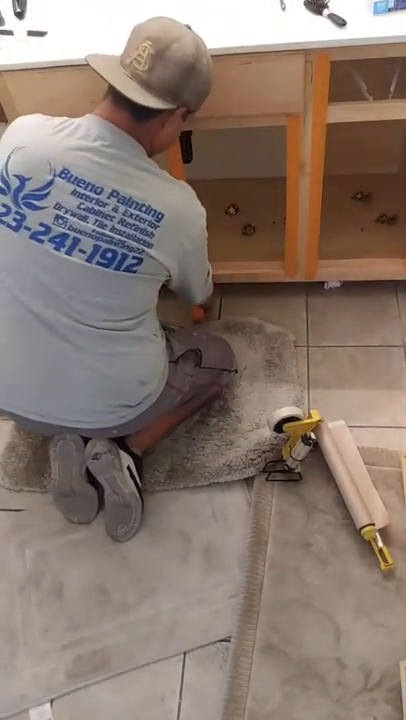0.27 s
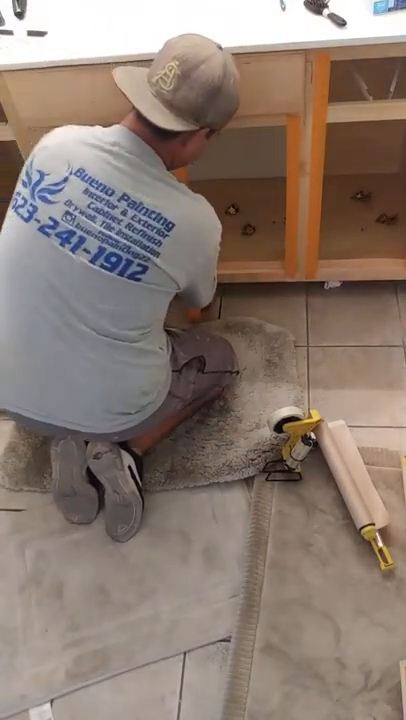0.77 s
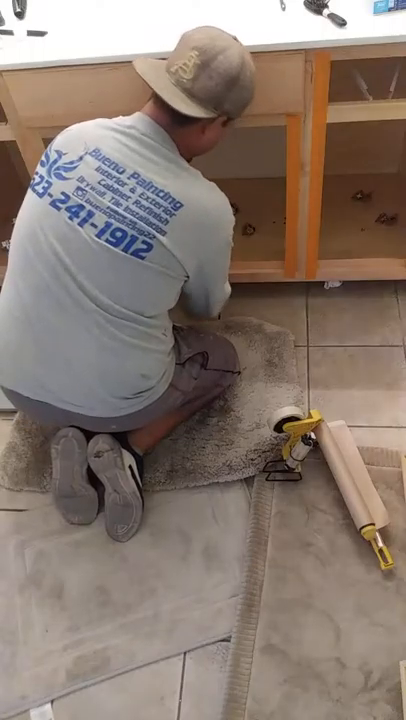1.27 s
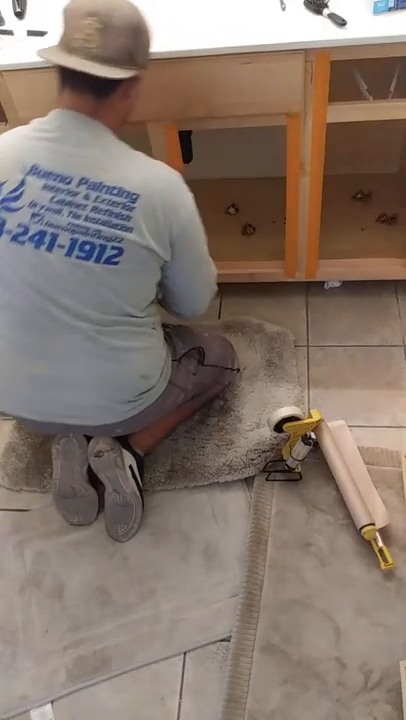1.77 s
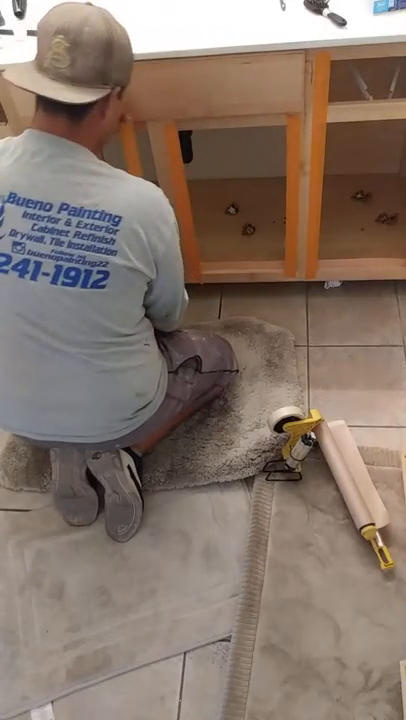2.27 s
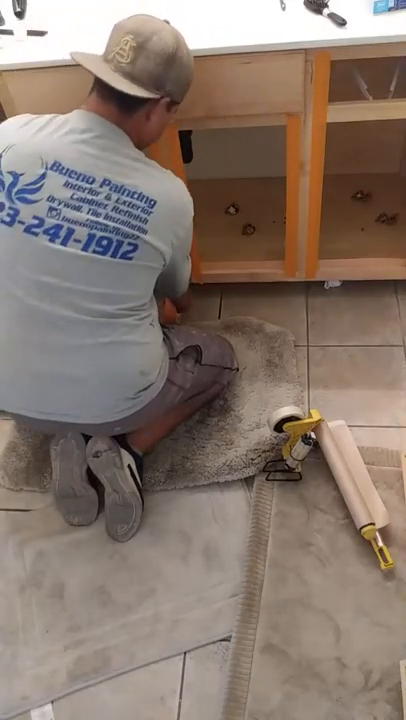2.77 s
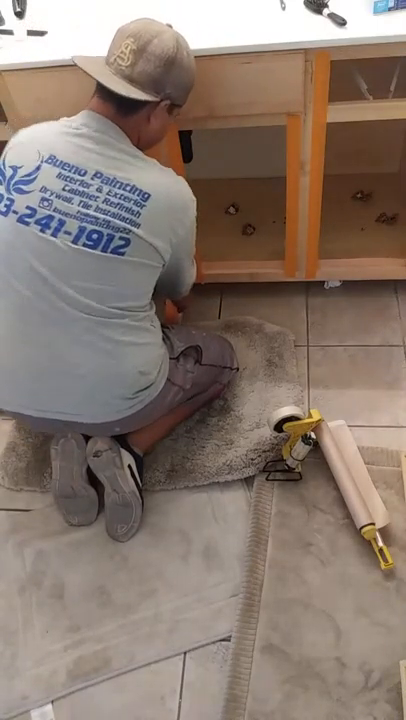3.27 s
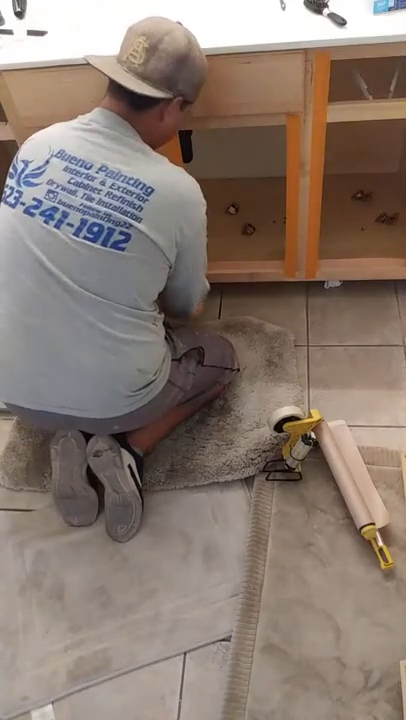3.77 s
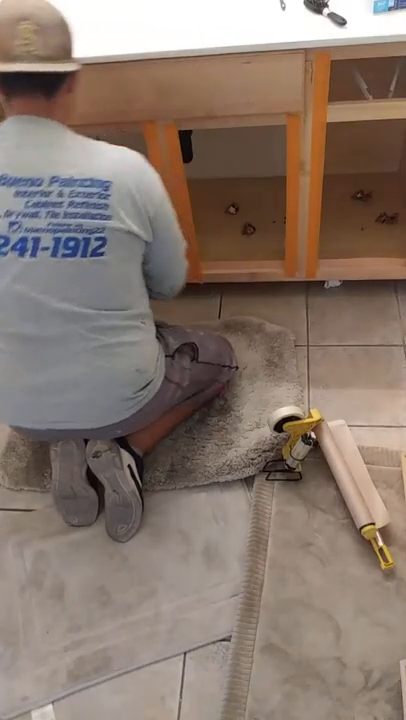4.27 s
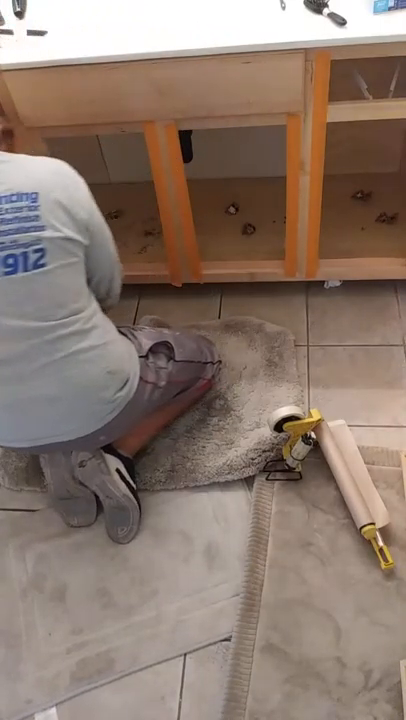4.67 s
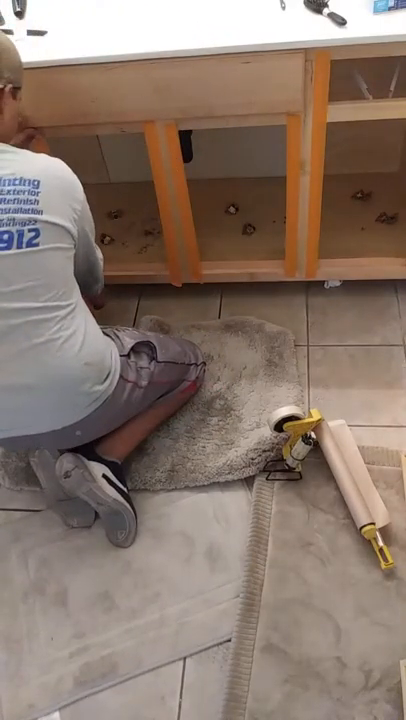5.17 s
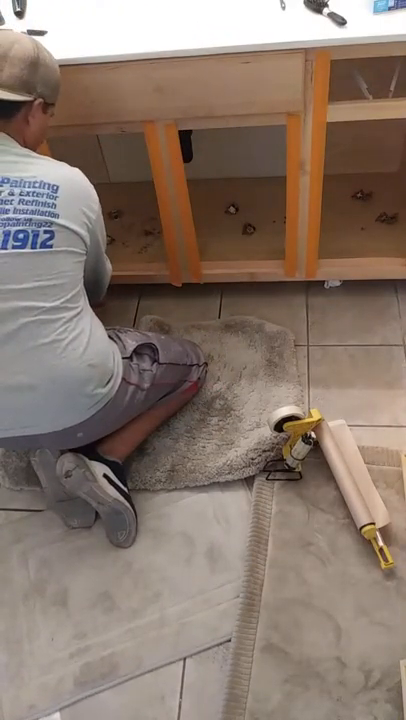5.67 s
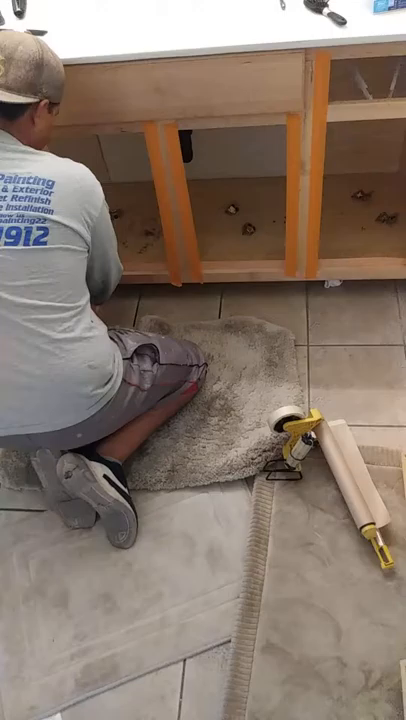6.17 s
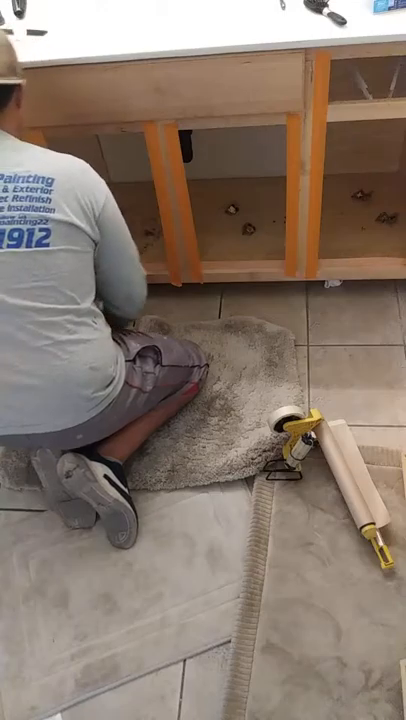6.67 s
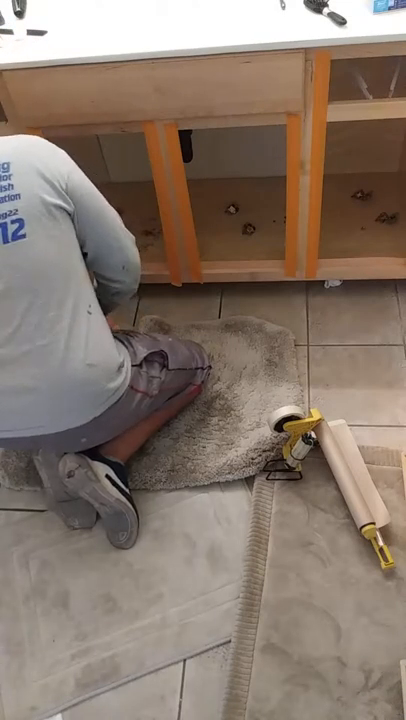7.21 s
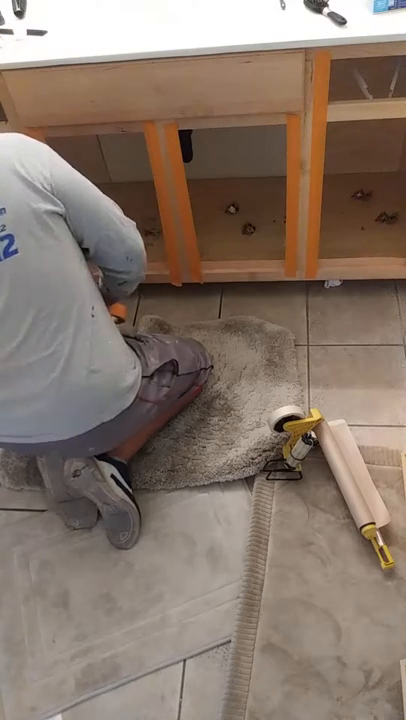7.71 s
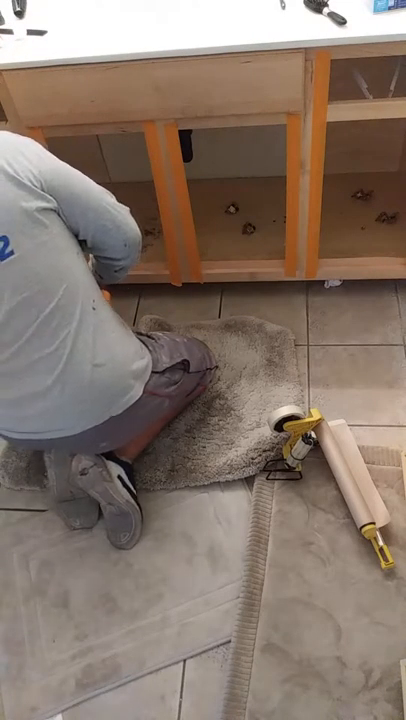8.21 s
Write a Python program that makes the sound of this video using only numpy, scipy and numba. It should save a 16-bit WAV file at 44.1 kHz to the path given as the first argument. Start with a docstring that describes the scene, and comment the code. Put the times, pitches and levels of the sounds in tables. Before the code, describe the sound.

Close handiwork heard in mono with a short, hard room reverberation: three brief, bright stick-slip rips of paper tape, each speeding up in pitch and then slackening. Between them come papery finger rubs, dull cloth scuffs, crisp tearing snaps and low wooden cabinet bumps. The last part is busiest, with jerky loud tugs and knocks before quieter smoothing. A very faint room hum lies underneath.

```python
"""Over a faint room hush with a low hum, rubbing and small tugs lead at 0.6 s into a rasping rip of masking tape.
Fingers then rub the tape onto a wooden frame until a sharp tear at 2.9 s; a second rip follows at 4 s, then
rubbing, a sliding hum of the wood and bumps. A third rip at 6.4 s runs into hard tugs, knocks, tears and rubbing.
Peeling is stick-slip at a rate set by pulling speed; hands and paper make shaped noise; roll and cabinet ring in
modes. The handiwork reverberates in a bare, tiled kitchen, in mono, under a limiter and a low-pass filter."""
import sys
import numpy as np
from scipy import signal
from scipy.fft import rfft, irfft
from scipy.io import wavfile
from scipy.ndimage import uniform_filter1d, minimum_filter1d
from numba import njit

SR = 44100
rng = np.random.default_rng(int(sys.argv[2]) if len(sys.argv) > 2 else 0)


def generate_wav(sig):
    """Save sig (samples, or channels by samples) to the path in sys.argv[1] as 16-bit PCM at SR."""
    pcm = np.round(np.clip(np.atleast_2d(sig).T, -1, 1) * 32767).astype(np.int16)
    wavfile.write(sys.argv[1], SR, pcm)


N = 372644
TIME = np.arange(N) / SR


def undb(db):
    """Level: decibels become an amplitude ratio."""
    return 10 ** (np.asarray(db) / 20)


def unit(x):
    """Normalization: scale a signal to an rms of 1."""
    return x / np.sqrt(np.mean(x ** 2))


def ring(x, response):
    """Linear system: convolve with an impulse response scaled to unit energy."""
    return signal.oaconvolve(x, response / np.linalg.norm(response))[:N]


def colour(x, spectrum, size=4096):
    """Minimum-phase filter: folding the cepstrum of a (hz, relative level_db) curve makes it causal."""
    hz, db = np.transpose(spectrum)
    bins = np.maximum(np.fft.rfftfreq(size, 1 / SR), 1)
    level_db = np.interp(np.log(bins), np.log(hz), db)
    cepstrum = irfft(np.log(undb(level_db)))
    cepstrum[1:size // 2] *= 2
    cepstrum[size // 2 + 1:] = 0
    return ring(x, irfft(np.exp(rfft(cepstrum))))


def crackle(rate_hz, spread_db):
    """Shot noise: random clicks of uneven size at a mean rate."""
    size = undb(spread_db * np.minimum(rng.exponential(size=N), 4))
    happens = rng.random(N) < rate_hz / SR
    return unit(happens * size * rng.standard_normal(N))


def unevenness(window_s):
    """Slow random modulation: averaging white noise over a window removes its fast changes."""
    return unit(uniform_filter1d(rng.standard_normal(N), int(window_s * SR)))


@njit
def resonate(x, hz, damping):
    """Second-order resonance: a moving state-variable filter returns high-pass and band-pass outputs."""
    high, band = np.empty(len(x)), np.empty(len(x))
    b, low = 0., 0.
    for i in range(len(x)):
        g = np.tan(np.pi * hz[i] / SR)
        v = (b + g * (x[i] - low)) / (1 + g * (g + damping))
        band[i] = damping * v
        high[i] = x[i] - band[i] - low - g * v
        b, low = 2 * v - b, low + 2 * g * v
    return high, band


def envelope(start_s, length_s, attack_s, release_s):
    """Amplitude envelope: a rounded attack, a hold and a straight release, all within the length."""
    rise = np.clip((TIME - start_s) / attack_s, 0, 1)
    fall = np.clip((start_s + length_s - TIME) / release_s, 0, 1)
    return rise * np.sin(np.pi / 2 * rise) * fall


def bell(centre_s, width_s):
    """Gaussian pulse: a smooth swell to 1 around one moment."""
    return np.exp(-np.minimum(((TIME - centre_s) / width_s) ** 2, 50))


def stroke(start_s, length_s):
    """Contact pressure: a hand leans in, slides and lifts."""
    return envelope(start_s, length_s, 0.2 * length_s, 0.32 * length_s)


def hush(level_db=-56, hum_hz=122, hum_db=-9, flicker_s=1 / 45, flicker_share=0.24):
    """Stationary noise plus a steady low tone; the level dips twice and flickers while low."""
    # spectrum of the room noise: hz, relative level_db
    noise_spectrum = [(25, -25.5), (55, -2.5), (85, -3), (115, -8), (220, -4), (420, -5.5), (1300, -12.5),
                      (3000, -14.5), (5800, -16), (8000, -32.5), (15500, -32.5)]
    # dips of the level: centre_s, half_width_s, depth_db
    dips = [(.11, 0.27, -13.5), (6.158, 0.098, -13)]
    hum = undb(hum_db) * unit(np.sin(2 * np.pi * hum_hz * TIME))
    dip_db = sum(depth_db * bell(s, width_s) for s, width_s, depth_db in dips)
    dip_db = dip_db * (1 + flicker_share * unevenness(flicker_s))
    noise = colour(rng.standard_normal(N), noise_spectrum)
    return undb(level_db + dip_db) * (noise + hum)


def kitchen(x, early_db=-4.5, tail_db=-3, early_s=0.0069, build_s=0.0051, sway_hz=2.4, count=3):
    """Reverberation: direct sound, early echoes and a decaying tail; paths cross-fade as the hands move."""
    # reverberation time of the kitchen: hz, t60_s
    reverberation = [(100, 0.51), (400, 0.45), (1500, 0.46), (4000, 0.52), (8000, 0.43), (16000, 0.31)]
    t = TIME[:SR]
    log_bins = np.log(np.arange(SR // 2 + 1) + 1)
    hz, t60 = np.transpose(reverberation)
    out = x
    for k in range(count):
        noise = rfft(rng.standard_normal(SR))
        tail = np.zeros(SR)
        for band, t60_s in zip(np.eye(len(hz)), t60):  # overlapping bands, each with its own decay
            weight = np.interp(log_bins, np.log(hz), band)
            tail += irfft(noise * weight, SR) * np.exp(-np.log(1000) * t / t60_s)
        tail *= 1 - np.exp(-t / build_s)
        early = rng.standard_normal(SR) * (rng.random(SR) < .1)  # sparse echoes
        early = early * np.exp(-t / early_s) * (t > .001)
        paths = undb(early_db) * early / np.linalg.norm(early)
        paths = paths + undb(tail_db) * tail / np.linalg.norm(tail)
        share = (1 + np.cos(2 * np.pi * (sway_hz * TIME + k / count))) / count  # the shares add up to 1
        out = out + signal.oaconvolve(x * np.sqrt(share), paths)[:N]
    return out / np.sqrt(1 + undb(early_db) ** 2 + undb(tail_db) ** 2)


def knocks(wood_db=27):
    """Impact excitation: roll and hands bump the cabinet's modes; a longer contact is duller."""
    # bumps: start_s, relative level_db, contact_ms (time scale of the push)
    bumps = [(.607, -31, 0.66), (0.645, -24.5, 0.6), (0.753, -37, 1), (0.784, -20.5, 3.1),
             (1.715, -42, 0.96), (1.878, -50, .4), (2.323, -34, 3), (2.903, -26.5, 0.47),
             (4.082, -35.5, 1.36), (4.4, -29.5, 1.3), (5.255, -27.5, 3.2), (5.338, -24.5, 9.3),
             (5.486, -30, 8.4), (5.549, -37, 14), (5.62, -23, 3.3), (5.655, -29.5, 3.5),
             (6.498, -25.5, 1.2), (6.552, -23.5, 3.1), (7.045, -25, 0.88), (7.069, -17, 1.4),
             (7.107, -17, 1.9), (7.128, -14, 1.95), (7.329, -24, 0.088), (7.348, -25.5, 0.62),
             (7.386, -22.5, 1.8), (7.517, -26, 11), (7.631, -44, 1.7), (7.839, -26, 11),
             (8.236, -25.5, 1.5)]
    # modes of the cabinet: hz, relative level_db, t60_s
    cabinet = [(62, -19.5, 0.13), (92, -14, 0.094), (119.6, -8.5, 0.39), (147, -2, 0.17), (185, -1.5, 0.16),
               (229.5, -6, 0.36), (256.2, -3.5, 0.36), (310, -2.5, 0.12), (353.7, -1.5, 0.23),
               (440, 6.5, 0.046), (585, -14, 0.069), (690, 0, 0.064), (921, -7, 0.1), (1020, -4.5, .1),
               (1405, 7, 0.045), (1570, -10, 0.065)]
    force, t = np.zeros(N), TIME[:SR // 4]
    for start_s, db, contact_ms in bumps:
        phase = TIME[:SR // 50] * 1000 / contact_ms
        push = phase * np.exp(-2 * np.pi * phase)
        start = max(int(start_s * SR), 0)
        force[start:start + len(push)] += undb(db) * push / push.sum()
    modes = np.zeros(len(t))
    for k, (hz, db, t60_s) in enumerate(cabinet):
        decay = undb(db - 60 * t / t60_s)
        modes += (-1) ** k * decay * np.sin(2 * np.pi * hz * t)  # neighbours have opposite signs
    return undb(wood_db) * ring(force, modes)


def slide(wood_hz=375, damping=0.43):
    """Friction-driven resonance: something slides along the frame and makes the wood hum."""
    # slides: start_s, length_s, level_db
    slides = [(4.642, 0.13, -45), (4.769, 0.22, -45), (4.978, .1, -45.5)]
    centre = np.full(N, 1. * wood_hz)
    friction = crackle(350, 3.7)
    hum = resonate(friction, centre, damping)[1]
    hum = resonate(hum, centre, 2 * damping)[1]
    pressure = sum(undb(db) * stroke(start_s, length_s) for start_s, length_s, db in slides)
    return pressure * unit(hum)


def rubs(hiss_db=-1, scuff_db=-2, catch_db=0.0):
    """Friction noise: fingers catch on the crepe ridges of the paper; cloth and wood answer lower down."""
    # smoothing fingers, shifting sleeves and knees: start_s, length_s, hiss and scuff relative level_db
    strokes = [(0.26, 0.047, -64, -70), (1.24, 0.28, -59, -54.5), (1.431, 0.4, -49, -50.5),
               (1.792, 0.088, -46.5, -47.5), (1.914, 0.089, -50.5, -52), (2.036, 0.53, -48, -66),
               (2.24, 0.26, -41.5, -52.5), (2.419, 0.2, -36.5, -56.5), (2.634, 0.12, -35, -41.5),
               (2.7, 0.28, -47.5, -55), (3.387, 0.098, -57, -54), (3.656, 0.057, -55, -59.5),
               (3.747, 0.21, -61.5, -55), (4.755, 0.3, -46.5, -53), (4.945, 0.052, -31, -40),
               (4.973, 0.11, -33.5, -43.5), (5.065, 0.12, -38, -58), (5.128, 0.21, -32, -38.5),
               (5.34, 0.28, -40, -51.5), (6.296, 0.056, -47, -69.5), (6.332, 0.08, -54, -61),
               (6.408, 0.089, -37.5, -62), (6.937, 0.16, -36.5, -42.5), (7.59, 0.11, -45, -46),
               (7.664, 0.24, -38.5, -62), (7.773, 0.14, -34, -54), (7.979, 0.097, -41, -49.5),
               (8.046, 0.094, -37, -53), (8.128, 0.095, -50, -57), (8.355, 0.14, -48.5, -50.5)]
    # spectra of fingers on paper and of dull scuffing: hz, relative level_db
    hiss_spectrum = [(300, -24.5), (1000, -20.5), (1700, -4), (2700, 2.5), (4500, 0), (6200, -3.5),
                     (8000, -15), (11000, -23.5), (16000, -45.5)]
    scuff_spectrum = [(50, -13.5), (130, -3.5), (250, -9), (370, 3), (560, -3), (950, -7.5), (1600, -6),
                      (4000, -50), (12000, -64)]
    hiss, scuff = np.zeros(N), np.zeros(N)
    for start_s, length_s, high_db, low_db in strokes:
        pressure = stroke(start_s, length_s)
        hiss += pressure * undb(high_db + hiss_db)
        scuff += pressure * undb(low_db + scuff_db)
    catches = undb(catch_db * unevenness(1 / 90))
    paper = colour(hiss * catches * crackle(7000, 1.9), hiss_spectrum)
    cloth = colour(scuff * catches * crackle(2500, 2.4), scuff_spectrum)
    return paper + cloth


def tears():
    """Fracture noise: paper fibres break in a quick run, and the sudden slack tugs at the frame."""
    # tears, crackles and tugs: peak_s, level_db, rise_s, fall_s, body_db (low body against the paper)
    bursts = [(1.697, -40.5, .001, 0.0024, 9.5), (1.719, -52.5, .004, 0.0055, 11),
              (1.881, -54, .002, 0.014, 14.5), (2.046, -46, 0.0037, 0.046, -12),
              (2.523, -27, .001, 0.0037, -27), (2.656, -41, 0.019, 0.012, 4.5),
              (2.903, -12, 0.0011, 0.008, -2), (2.908, -19.5, 0.00089, 0.003, -3.5),
              (5.603, -19.5, 0.0021, 0.032, -4), (6.396, -34, 0.0017, 0.012, -24),
              (7.109, -44.5, 0.075, 0.028, 18), (7.331, -33, 0.0024, 0.017, 15.5),
              (7.468, -21, 0.0015, 0.0029, -26), (7.494, -29.5, 0.025, 0.04, -16),
              (8.057, -26, 0.0007, 0.0028, -11), (8.231, -19, 0.012, 0.016, -0.5)]
    # spectra of the tearing paper and of its low body: hz, relative level_db
    paper_spectrum = [(100, -20), (500, 0), (1200, -22.5), (2500, 2), (4000, 3), (6000, -0.5),
                      (8000, -14.5), (11000, -22.5), (16000, -34)]
    body_spectrum = [(50, -34), (130, -12.5), (280, -4.5), (500, 1.5), (720, -3.5), (1300, -5.5),
                     (2000, -2), (5000, -13.5), (15000, -52)]
    paper, body = np.zeros(N), np.zeros(N)
    for peak_s, db, rise_s, fall_s, body_db in bursts:
        peak = int(peak_s * SR)
        near = slice(max(peak - SR // 20, 0), peak + SR // 5)
        t = TIME[near] - peak_s
        burst = undb(db) * np.exp(-np.maximum(-t / rise_s, t / fall_s))
        paper[near] += burst
        body[near] += burst * undb(body_db)
    paper_sound = colour(paper * crackle(24000, 4.8), paper_spectrum)
    return paper_sound + colour(body * crackle(6000, 0.28), body_spectrum)


def roll(x):
    """Modal resonance: the stiff roll adds its narrow rings to whatever shakes it."""
    # rings of the roll: hz, width_hz, relative level_db
    roll_rings = [(838, 64, -7.5), (1008, 73, -1), (1990, 23, -15.5), (1990, 34, -10.5), (2560, 90, -14),
                  (3064, 39, -10), (3690, 13, -5), (3940, 22, -16.5), (4880, 130, -4)]
    t = TIME[:SR // 4]
    response = 1. * (t == 0)  # the direct sound
    for hz, width_hz, db in roll_rings:
        gain = undb(db) * 2 * np.pi * width_hz / SR
        response += gain * np.exp(-np.pi * width_hz * t) * np.cos(2 * np.pi * hz * t)
    return ring(x, response)


@njit
def slips(hz, uneven, chance):
    """Stick-slip: one click per slip, each wait and size drawn anew; constant power at any rate."""
    out = np.zeros(len(hz) + 1)
    phase, wait, k = 0., 1., 0
    for i in range(len(hz)):
        step = hz[i] / SR
        phase += step
        if phase >= wait:
            phase = min(phase - wait, step)
            size = np.exp(uneven[i] * (chance[k, 1] - uneven[i]) / 2) / np.sqrt(step)
            out[i] += size * phase / step  # the click falls between two samples
            out[i + 1] += size * (1 - phase / step)
            wait = np.exp(uneven[i] * (chance[k, 0] - uneven[i] / 2))
            k += 1
        out[i] -= np.sqrt(step)  # the tape creeps back between slips
    return out[:-1]


def tug(start_s, length_s, attack_s, db, hz, uneven):
    """Stick-slip at constant speed, for a little tape: gain, slip rate and unevenness over time."""
    gain = undb(db) * envelope(start_s, length_s, attack_s, 0.56 * length_s)
    return gain, np.full(N, 1. * hz), np.full(N, 1. * uneven)


def rip(start_s, length_s, db, loose_hz, drag_hz, top_hz, last_hz, top_after_s, slowing_s, uneven):
    """Speed-controlled stick-slip, one arm swing: gain, slip rate and unevenness over time."""
    break_s, speed_up_s = .018, .048  # the glue gives way, the arm gathers speed
    drag_uneven, slack_uneven = .07, .2  # extra scatter while the tape drags and as it goes slack
    surge_lead_s, surge_s, surge_uneven, surge_db = .072, .045, .36, 2
    speed_db = 4  # added at full speed
    top_s = start_s + top_after_s
    early = TIME < top_s
    speeding = np.exp(np.minimum(TIME - top_s, 0) / speed_up_s)
    speed = np.where(early, speeding, bell(top_s, slowing_s))
    dragging = drag_hz + (loose_hz - drag_hz) * np.exp(-np.maximum(TIME - start_s, 0) / break_s)
    racing = dragging * (top_hz / dragging) ** speed
    rate = np.where(early, racing, last_hz + (top_hz - last_hz) * speed)
    surge = bell(top_s - surge_lead_s, surge_s)  # just before full speed the slips turn ragged and loud
    scatter = np.where(early, drag_uneven, slack_uneven) * (1 - speed)
    gain = envelope(start_s, length_s, .015, 0.12) * undb(db + speed_db * speed + surge_db * surge)
    return gain, rate, uneven + surge_uneven * surge + scatter


def pulls(fibre_db=-8, edge=0.43, edge_damping=1.0, even=0.073, span_db=10, span_damping=0.47,
          snag_db=2.5, threads_db=-19, rumble_db=-34, count=8):
    """Stick-slip in parallel: strips across the tape slip on their own over glue fizz and roll rumble."""
    # long rips: start_s, length_s, level_db, breaking-loose slip rate loose_hz, dragging drag_hz, full-speed
    # top_hz, final last_hz, time to full speed top_after_s, slowing_s, unevenness of the slips (0-1)
    rips = [ (.6, 0.43, -9.5, 329.9, 280, 2499, 1047, .222, .112, 0.09),
            (4.02, 0.47, -12.5, 1150, 827.4, 2998, 1250, .168, .118, .19),
            (6.44, 0.4, -11.5, 1844, 561.2, 3305, 797.4, .228, .06, .19)]
    # short tugs: start_s, length_s, attack_s, level_db, slip rate hz, unevenness (0-1)
    tugs = [(0.532, 0.071, 0.021, -35, 471, 0.17), (0.591, 0.041, 0.0099, -33, 476, 0.45),
            (3.96, 0.044, 0.012, -33, 5500, 0.29), (3.984, 0.074, 0.037, -19.5, 2110, 0.23),
            (5.136, 0.045, 0.02, -31.5, 3480, 0.48), (5.17, 0.042, 0.0043, -21.5, 3767, 0.18),
            (5.19, 0.069, .01, -30, 3570, 0.18), (5.239, 0.023, 0.0052, -20.5, 2260, .18),
            (7.011, 0.021, .011, -8.5, 3016, 0.24), (7.033, 0.018, 0.0073, -9, 2902, 0.12),
            (7.044, 0.078, 0.015, -11.5, 2036, .14), (7.1, 0.069, 0.012, -17, 2196, 0.3),
            (7.715, 0.092, 0.046, -34, 2806, 0.14), (7.787, 0.052, 0.017, -47, 2410, 0)]
    # spectra of the peeling tape, the snapping glue threads and the turning roll: hz, relative level_db
    peel_spectrum = [(40, -30.5), (130, -6), (280, -0.5), (550, -7.5), (900, -7), (1400, -4.5),
                     (2200, -0.5), (3500, 2), (5200, -0.5), (6400, -5), (8000, -17.5), (10500, -22.5),
                     (13000, -30), (16000, -29)]
    thread_spectrum = [(1000, -49), (6000, -17.5), (10000, -1), (15500, -2)]
    rumble_spectrum = [(30, -9), (70, -9.5), (130, -6), (220, -8), (300, 7.5), (450, -9), (900, -26),
                       (4000, -60)]
    tape, effort, ragged = np.zeros(N), np.zeros(N), np.zeros(N)
    fizz = crackle(9000, 3.6)
    snags = undb(snag_db * unevenness(1 / 170))  # the glue holds unevenly
    for gain, hz, uneven in [rip(*row) for row in rips] + [tug(*row) for row in tugs]:
        on = gain > 0
        rate, scatter = hz[on], np.clip(uneven[on], .05, 1)
        strips = [slips(rate, scatter, rng.standard_normal((SR // 4, 2))) for _ in range(count)]
        rasp = sum(strips) / np.sqrt(count) + undb(fibre_db) * fizz[on]
        rasp = resonate(rasp, edge * rate, edge_damping)[0]  # taut tape sheds its lows
        singing = undb(span_db) * np.exp(-scatter / even)  # the free span sings when slips come evenly
        span = singing * resonate(rasp, rate, span_damping)[1]
        tape[on] += gain[on] * (rasp + span) / np.sqrt(1 + singing / 2)
        effort += gain
        ragged += gain * uneven ** 2
    peeling = colour(snags * tape, peel_spectrum)
    threads = undb(threads_db) * colour(ragged * crackle(8000, 1.5), thread_spectrum)
    rumble = undb(rumble_db) * colour(effort * crackle(380, 2.7), rumble_spectrum)
    return peeling + threads + rumble


def scene():
    """Superposition: all the handiwork sounds in the one room, with both channels alike."""
    torn = tears()
    roll_share = 0.43  # part of each tear that reaches the roll
    through_roll = roll(pulls() + roll_share * torn + rubs())
    handiwork = through_roll + (1 - roll_share) * torn + knocks() + slide()
    mono = kitchen(handiwork) + hush()
    return np.array([mono, mono])


def record(dry, ceiling=0.91, size=129, top_hz=15850):
    """Peak limiting and low-pass filtering: smoothed gain holds the peaks, then the top is cut."""
    room_left = np.minimum(1, ceiling / (np.abs(dry) + 1e-9))
    gain = uniform_filter1d(minimum_filter1d(room_left, size), size)  # size in samples
    low_pass = signal.ellip(10, .2, 70, top_hz, fs=SR, output="sos")
    return signal.sosfilt(low_pass, dry * gain)


dry = scene()
out = record(dry)
generate_wav(out)
```